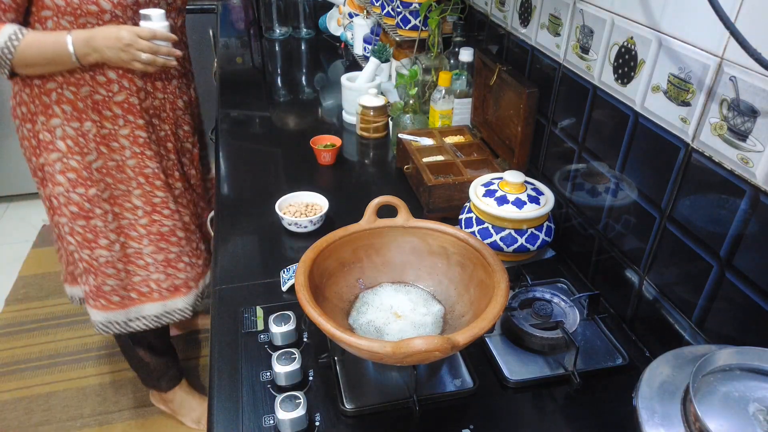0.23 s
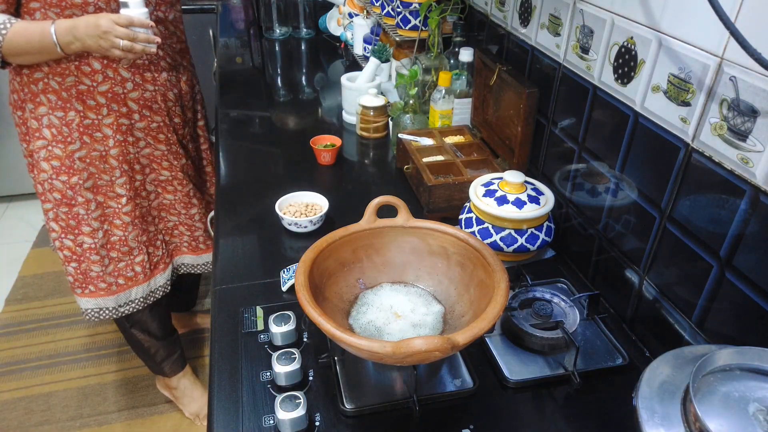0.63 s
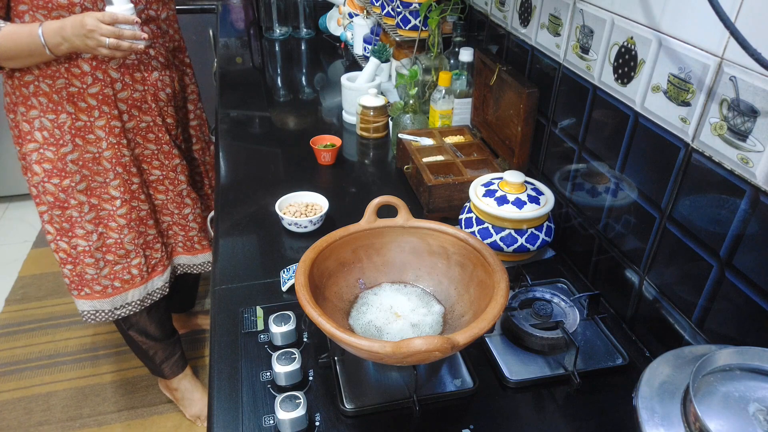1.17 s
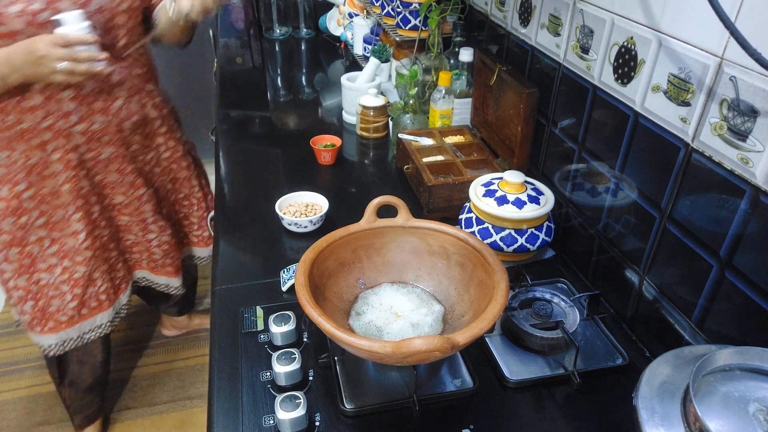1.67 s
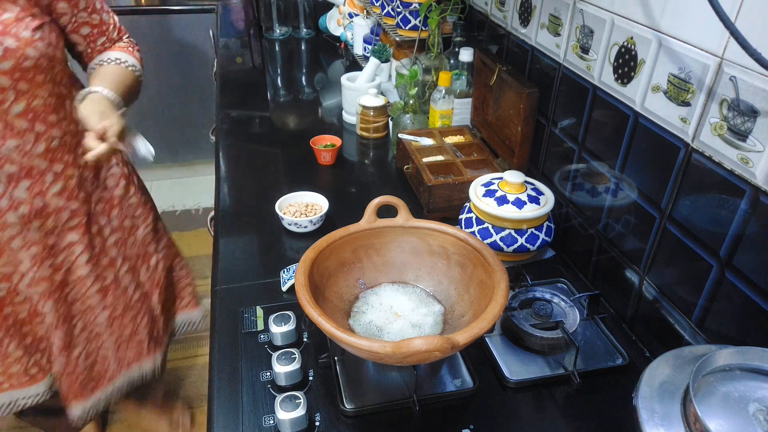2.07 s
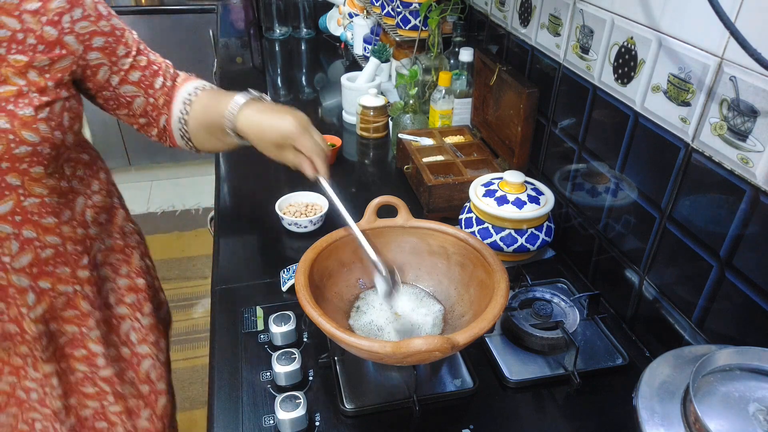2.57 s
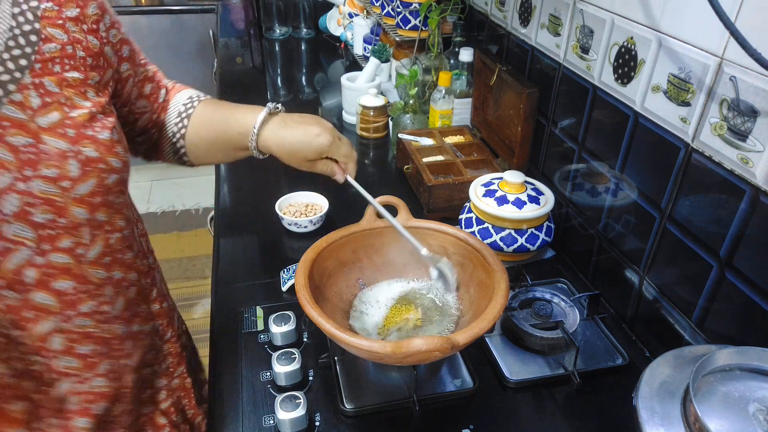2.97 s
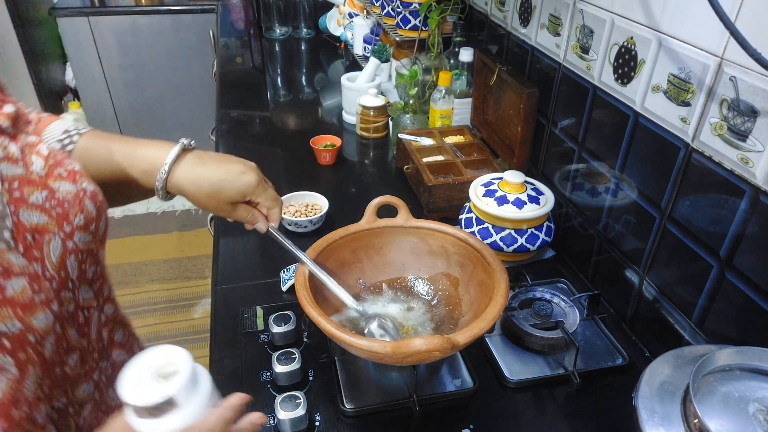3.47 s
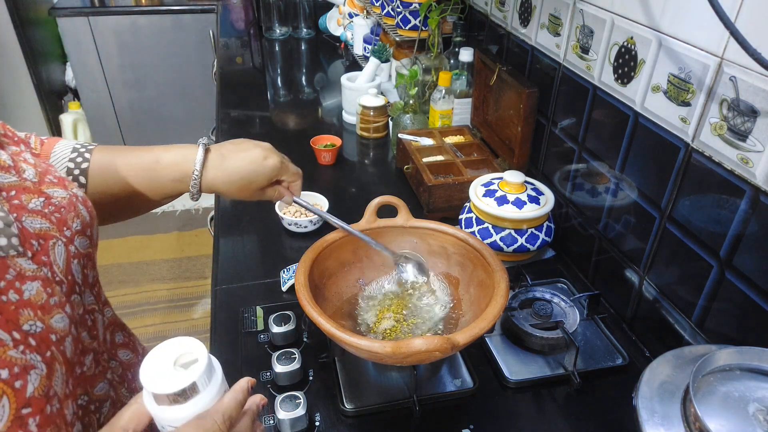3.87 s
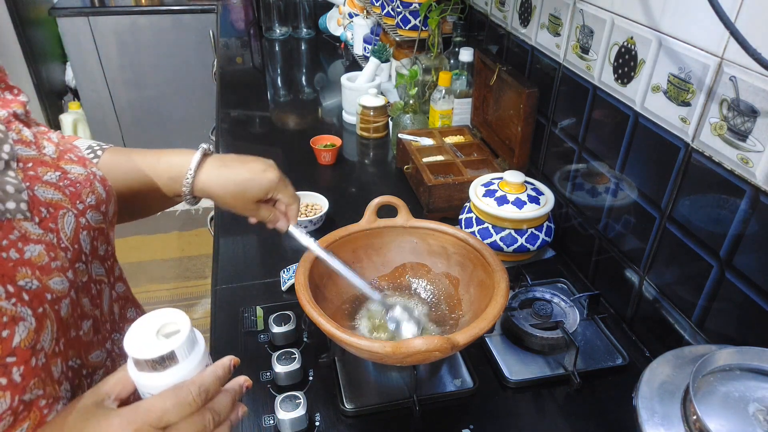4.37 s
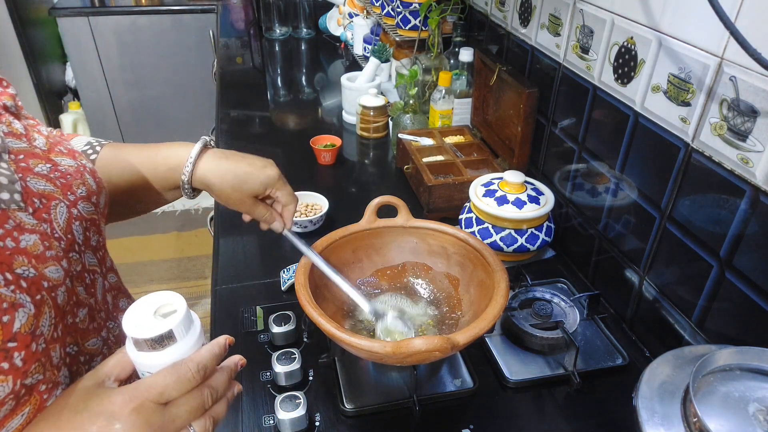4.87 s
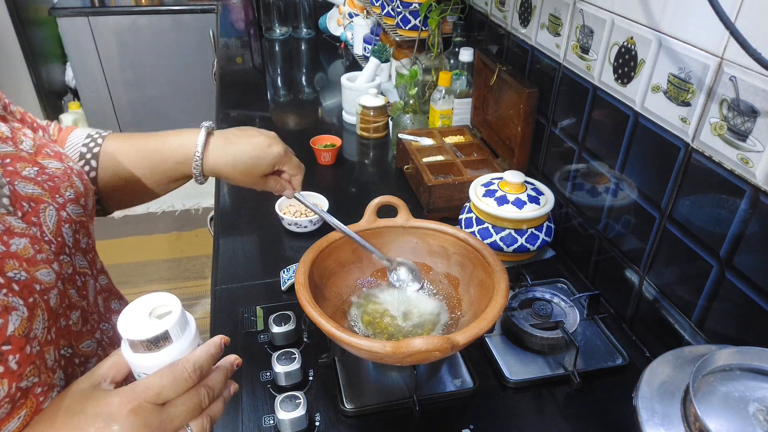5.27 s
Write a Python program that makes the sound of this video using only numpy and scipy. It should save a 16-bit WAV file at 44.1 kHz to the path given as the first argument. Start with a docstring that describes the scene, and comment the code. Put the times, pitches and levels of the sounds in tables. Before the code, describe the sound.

Mustard seeds pop in hot oil from the start, with sharp, bright, irregular cracks over a faint fizz. A low appliance hum and rush of air run underneath, and the small tiled kitchen adds a short echo. At about 0.5 seconds a spice jar's lid rubs, comes off with a hollow plop at 0.7, and gives a light knock. Around 1.2 seconds steel slides over steel as a ladle is fetched, ringing briefly. From 2.5 seconds the ladle taps the clay pot several times, then scrapes round it in three gritty turns, at roughly 3.2, 4.1 and 4.9 seconds. Each turn has a short squeak and a metallic ring as the ladle slips, with light knocks between. The pops thin out after 3.5 seconds and end before 4. A last tap and short scrape come at about 5.5 seconds.

```python
"""In a small tiled kitchen, an appliance hums while mustard seeds pop in hot oil in a clay pot.
Each husk splits with a crack and a snap of steam, and fine bubbles fizz around the seeds.
A spice jar's lid rubs and comes off with a hollow plop; steel clatters as a ladle is fetched.
The ladle taps the pot and scrapes round it in three turns, catching on the grains of the clay,
squeaking, and ringing each time it slips."""
import sys
import numpy as np
from scipy import signal
from scipy.fft import rfft, irfft, next_fast_len
from scipy.io import wavfile
from scipy.ndimage import uniform_filter1d, map_coordinates

SR = 44100
rng = np.random.default_rng(int(sys.argv[2]) if len(sys.argv) > 2 else 0)


def to_wav(s):
    """Save 16-bit WAV."""
    ch = np.atleast_2d(s).T  # columns
    pcm = np.round(np.clip(ch, -1, 1) * 32767)  # PCM
    wavfile.write(sys.argv[1], SR, pcm.astype(np.int16))


N = 242991
TIME = np.arange(N) / SR  # seconds into the scene
AGE = np.arange(SR * 3 // 5) / SR  # seconds into one short sound

# Levels in the tables are relative. A "decay" is the time a sound takes to fade by 60 dB.
# How long the tiled room echoes: f/Hz, decay/s
ROOM_DECAY = [(200, 0.47), (1000, 0.41), (3500, 0.33), (9000, 0.27), (16000, 0.21)]
# Tone colour of the low rush of air: f/Hz, level/dB
AIR_SPECTRUM = [(15, -24), (25, -15), (58, -12.5), (102, 1), (257, -10.5), (486, -10.5), (918, -29),
                (1200, -60), (2360, -46), (2500, -49), (3250, -68), (5500, -120)]
# The appliance's drone: f/Hz, level/dB, half width/Hz
HUM_BANDS = [(99.2, -52.5, 4.6), (94.3, -50, 7.4), (164.1, -54, 1.75), (313.7, -59.5, 12)]
# How strongly the oil fizzes: t/s, level/dB
FIZZ_LEVELS = [(0, -58.5), (1.1, -46), (1.6, -61.5), (3.0, -53.5), (3.35, -49), (3.6, -54), (4.7, -58),
               (5.5, -57)]
# Tone colour of the bubbles: f/Hz, level/dB
FIZZ_SPECTRUM = [(800, 0.5), (2500, -4.5), (5000, -4.5), (9000, -8), (12500, -2.5), (15500, -11),
                 (18000, -41)]
# Twists of the lid: t/s at full pressure, rise/s, hold/s, level/dB
LID_TWISTS = [(0.545, 0.012, 0.05, -43), (0.657, 0.081, 0.034, -34.5), (0.817, 0.0072, 0.42, -39)]
# Tone colour of the lid rubbing on the rim: f/Hz, level/dB
RUB_SPECTRUM = [(350, -34), (600, -5), (1040, -7.5), (1520, 2), (6960, -4), (9880, -10), (13100, -7),
                (15000, -12.5)]
# Tones of the air inside the jar: f/Hz, level/dB, decay/s
JAR_TONES = [(447.4, -2.5, 0.2), (424, -5, 0.28), (506, -7, 0.4), (725, -11, 0.13), (930, -3, 0.053),
             (1112, -6, 0.084)]
# Steel sliding on steel: t/s, level/dB, swell/s, decay/s
STEEL_SLIDES = [(1.163, -24, 0.00039, 0.5), (1.197, -9.5, 0.004, 0.14), (1.215, -11, 0.041, 0.25)]
# Tone colour of that sliding: f/Hz, level/dB
SLIDE_SPECTRUM = [(120, -35), (200, -36), (299, -0.5), (491, -11), (548, -10.5), (749, -18.5), (791, -15.5),
                  (2050, -4), (2330, -3), (3690, -6.5), (4350, -4), (12600, -6.5), (16000, -6)]
# Tones of the steel left ringing: f/Hz, level/dB, decay/s
STEEL_TONES = [(2426, 12, 0.33), (2660, -2, 0.68), (4100, -4, 0.99), (6900, 0, 0.72), (8100, 6, 0.71),
               (10500, 10, 0.58)]
# Knocks of the ladle and the jar: t/s, level/dB, f/Hz at the centre of the tap
KNOCK_HITS = [(0.13, -44, 2800), (0.1485, -29, 3450), (0.8183, -31.5, 1780), (1.478, -43, 1940),
              (1.886, -40.5, 3500), (2.5087, -45.5, 3320), (2.5606, -35.5, 3650), (2.6318, -40, 2400),
              (2.744, -37.5, 4120), (2.8456, -27.5, 4100), (2.847, -36, 600), (3.106, -30.5, 2420),
              (3.1438, -31, 3600), (3.226, -37, 3950), (4.093, -31.5, 3100), (4.357, -44, 3700),
              (4.5387, -38.5, 4170), (4.7513, -38, 2280), (5.4141, -37, 3340)]
# Tone colour of a knock's tap: f/centre f, level/dB
TAP_SHAPE = [(1 / 6, -22), (1 / 2, -8), (1, 0), (1.33, -5), (2, -16), (5, -24)]
# Tone colour of a knock's thud: f/Hz, level/dB
THUD_SPECTRUM = [(80, -8), (300, -20), (650, 13), (1500, -22), (5000, -79)]
# Squeaks of steel: t/s, level/dB, length/s, start f/Hz, end f/Hz
SQUEAK_GLIDES = [(1.322, -30, 0.046, 2690, 2690), (3.287, -34.5, 0.14, 1080, 1348),
                 (4.131, -30.5, 0.063, 1580, 1310), (4.829, -30.5, 0.094, 1564, 1368)]
# Ladle strokes: t/s at full pressure, rise/s, hold/s, scrape level/dB, grind level/dB, ring level/dB
LADLE_STROKES = [(2.602, 0.023, 0.0072, -35.5, -51, -73), (2.844, 0.0033, 0.047, -32, -39.5, -49),
                 (3.248, 0.069, 0.25, -31.5, -37.5, -32), (3.667, .06, 0.027, -41, -39.5, -34),
                 (4.093, 0.06, 0.16, -30.5, -38.5, -34), (4.428, .08, 0.0228, -37.5, -40, -33),
                 (4.852, .13, 0.16, -31.5, -37.5, -32), (5.416, 0.0022, 0.0054, -52, -60, -47.5),
                 (5.478, 0.033, .02, -36, -43, -35)]
# Tone colour of the bright scraping on clay: f/Hz, level/dB
SCRAPE_SPECTRUM = [(150, -17), (280, -14), (480, -4.5), (800, -21), (1600, -15.5), (2200, 1.5),
                   (2700, -2.5), (3200, 3), (4400, -1), (5500, -8), (8000, -14), (11000, -19.5),
                   (16000, -16)]
# Tone colour of the low grinding on clay: f/Hz, level/dB
GRIND_SPECTRUM = [(90, -20), (170, -3), (260, 1.5), (420, -13), (800, -5), (1100, -6), (1400, -1),
                  (1800, -13), (2300, -8.5), (6000, -56)]
# Tones of the ladle's steel bowl, lowest first: f/Hz, level/dB, decay/s
LADLE_TONES = [(1292, -3, 0.34), (1841, 7.5, 0.23), (2134, -7.5, 0.33), (2566, 8.5, 0.16), (3050, -8, 0.33),
               (3920, -24.5, 0.33), (4340, 3.5, 0.089), (5275, -13, 0.21)]
# Seed pops, and one faint tick just before the louder pop at 2.05 s: t/s, crack level/dB, snap level/dB
POPS_AND_TICK = [(0.0014, -28, -27.5), (0.1492, -17, -38), (0.3524, -18, -34), (0.381, -21, -29.5),
                 (0.4354, -29, -33.5), (0.5554, -36.5, -30), (0.6196, -30, -30.5), (0.883, -14.5, -45),
                 (0.949, -21, -28.5), (0.9783, -25.5, -39), (1.0075, -27.5, -30), (1.413, -25, -34),
                 (1.7371, -26, -47), (1.7537, -23.5, -27), (1.9936, -36.5, -45), (2.0425, -30, -48),
                 (2.0519, -21, -32.5), (2.2595, -25.5, -26.5), (2.3306, -30.5, -41), (2.387, -41.5, -50),
                 (2.4786, -35, -41.5), (2.5516, -31, -50), (2.729, -31, -36), (2.8253, -31.5, -38),
                 (2.8942, -25, -34), (2.9839, -22, -31), (3.052, -32, -35), (3.0854, -21, -28),
                 (3.1568, -27, -41), (3.4115, -20.5, -29), (3.454, -23, -21), (3.847, -36.5, -47)]
# Tone colour of a husk cracking: f/Hz, level/dB
CRACK_SPECTRUM = [(500, -26.5), (2500, -10.5), (5000, -2), (7500, 2.5), (10000, -0.5), (13000, 7.5),
                  (15500, 0.5), (18000, -3)]
# Tone colour of the snap of steam: f/Hz, level/dB
SNAP_SPECTRUM = [(150, -21), (500, 0.5), (900, -7.5), (1800, -2), (3300, 2), (5000, 2.5), (8000, -32),
                 (16000, -1)]


def amp(db):
    """Turn decibels into a number to multiply a sound by."""
    return 10 ** (np.asarray(db) / 20)


def unit(x):
    """Scale a signal to an average power of 1."""
    return x / np.sqrt(np.mean(x ** 2) + 1e-20)


def pan(right_db):
    """Left and right gains that make the right side right_db louder than the left."""
    return amp([[-right_db / 2], [right_db / 2]])


def look_up(points, hz):
    """Read between the rows of a (frequency, value) table, on a scale of octaves."""
    freqs, values = np.transpose(points)
    return np.interp(np.log(hz + 1), np.log(freqs + 1), values)


def wobble(rate):
    """A smooth curve through `rate` random values a second."""
    return map_coordinates(rng.standard_normal(int(N * rate / SR) + 4), [TIME * rate])


def fade(decay_s, t=AGE):
    """A curve that falls by 60 dB in decay_s seconds."""
    return np.exp(-np.log(1000) * t / decay_s)


def add(track, start_s, sound):
    """Mix a sound into a track at the given time."""
    part = track[..., max(round(start_s * SR), 0):][..., :sound.shape[-1]]
    part += sound[..., :part.shape[-1]]


def colour(x, spectrum):
    """Give a sound a tone colour; white noise keeps its power."""
    n = x.shape[-1]
    size = 2 * next_fast_len(n // 2 + 2048)
    gain = unit(amp(look_up(spectrum, np.fft.rfftfreq(size, 1 / SR))))
    cepstrum = irfft(np.log(gain + 1e-6))
    # Folding onto the first half makes the filter ring after a click, never before it.
    cepstrum[1:size // 2] *= 2
    cepstrum[size // 2 + 1:] = 0
    return irfft(rfft(x, size) * np.exp(rfft(cepstrum)), size)[..., :n]


def grains(rate, spread_db, size=N):
    """Tiny random clicks of uneven strength, about `rate` a second."""
    hits = rng.random(size) < rate / SR
    signs = rng.choice([-1, 1], size)
    strengths = amp(spread_db * np.clip(rng.standard_normal(size), -2, 2))
    return unit(hits * signs * strengths)


def ring(tones, swell_s, roughness, touch_s=0.35):
    """An object's own fading tones, which waver while the parts touch and then settle."""
    hz, db, decay_s = np.transpose(tones)[:, :, None]
    jostle = rng.standard_normal((len(hz), len(AGE))) * fade(touch_s)
    wander = np.cumsum(jostle, 1) / np.sqrt(SR)
    phase = 2 * np.pi * (hz * AGE + rng.random(hz.shape) + roughness * wander)
    level = amp(db + rng.standard_normal(hz.shape))
    return np.sum(level * fade(decay_s) * np.sin(phase), 0) * (1 - np.exp(-AGE / swell_s))


def spread(x):
    """A ringing tone reaches left and right a sixth of a cycle apart."""
    turn = np.exp(1j * np.pi / 6 * np.array([[1], [-1]]))
    return np.real(signal.hilbert(x, next_fast_len(N))[:N] * turn)


def room_echo():
    """The kitchen's echo of a click, left and right: noise whose treble dies first."""
    hz, t, bands = signal.stft(rng.standard_normal((2, len(AGE))), SR, nperseg=256)
    bands = bands * fade(look_up(ROOM_DECAY, hz)[:, None], t)
    echo = signal.istft(bands, SR, nperseg=256)[1][:, :len(AGE)]
    return echo / np.linalg.norm(echo[0])


def in_room(x, echo_db):
    """A sound with its echoes, at about the same power."""
    echo = signal.fftconvolve(x[None], room_echo(), axes=1)[:, :len(x)]
    return (x + amp(echo_db) * echo) / np.hypot(1, amp(echo_db))


def burst(scatter_db, scatter_s, echo_db):
    """A faint tick, then a click with its bounce off the pot, scatter off the stove and room echo."""
    scatter = rng.standard_normal((2, len(AGE))) * fade(scatter_s)
    click = amp(scatter_db) * scatter / np.linalg.norm(scatter[0]) + amp(echo_db) * room_echo()
    for side, bounce_s in zip(click, rng.uniform(.0008, .0012, 2)):
        side[rng.integers(5)] += 1
        side[round(bounce_s * SR)] += .6
    tick = np.zeros((2, round(.0009 * SR)))
    tick[:, 0] = 0.19
    return np.hstack([tick, click])


def pressure_db(peak_s, rise_s, hold_s, rise_db=28.5, sag_db_per_s=34, release_db_per_s=158):
    """A hand bears down to 0 dB at peak_s, slackens through the hold, then eases off."""
    since = TIME - peak_s
    return (-rise_db * np.maximum(-since, 0) / rise_s
            - sag_db_per_s * np.clip(since, 0, hold_s)
            - release_db_per_s * np.maximum(since - hold_s, 0))


def moving_contact(x, depth_db):
    """Narrow peaks, mostly below 6 kHz, come and go as the touching point moves; loudness stays."""
    hz, _, bands = signal.stft(x, SR, nperseg=512)
    drift = uniform_filter1d(rng.standard_normal(bands.shape[1:]), size=3, axis=0)  # smooth in pitch
    drift = unit(uniform_filter1d(drift, size=5, axis=1))  # and in time
    gain = amp(depth_db * np.clip(drift, -1.5, 1.5) / np.hypot(1, (hz[:, None] / 6000) ** 2))
    gain /= np.sqrt(uniform_filter1d(gain ** 2, size=17, axis=0))
    return unit(signal.istft(bands * gain, nperseg=512)[1][:, :N])


def air_and_appliance():
    """A low rush of air and an appliance's drone; both sink for a second before the stirring."""
    middle, side = colour(rng.standard_normal((2, N)), AIR_SPECTRUM)
    air = amp(-53) * np.array([middle + amp(-12) * side, middle - amp(-12) * side])
    freqs = np.fft.rfftfreq(N, 1 / SR)
    hum = np.zeros(N)
    for hz, db, width_hz in HUM_BANDS:
        narrow_noise = rfft(rng.standard_normal(N)) / (1 + ((freqs - hz) / width_hz) ** 2)
        hum += amp(db) * unit(irfft(narrow_noise, N))
    level = amp(np.interp(TIME, [1.2, 1.6, 2.4, 3.1], [4, 0, 0, 4]))
    return level * (air + amp(-2.5) * hum * pan(right_db=3))


def oil_fizz():
    """Fine bubbles fizz round the seeds, each one a tiny click."""
    times, levels_db = np.transpose(FIZZ_LEVELS)
    level = uniform_filter1d(amp(np.interp(TIME, times, levels_db)), 256)
    bubbles = colour(grains(4000, spread_db=2), FIZZ_SPECTRUM)
    return in_room(level * bubbles, echo_db=29)


def spice_jar(plop_s=.656):
    """The lid rubs on the rim, then lets go and sets the air in the jar ringing."""
    plop = np.zeros(N)
    add(plop, plop_s, amp(-19) * ring(JAR_TONES, swell_s=0.0075, roughness=2.86, touch_s=1.0))
    twist = sum(amp(db + pressure_db(t, rise_s, hold_s)) for t, rise_s, hold_s, db in LID_TWISTS)
    rub = twist * amp(-1) * colour(grains(2700, spread_db=3), RUB_SPECTRUM)
    return in_room(plop, echo_db=-4.5) + in_room(rub, echo_db=3.5)


def steel_clatter(ring_s=1.2):
    """Steel slides over steel in a rush of tiny contacts and is left ringing as it swings."""
    rush, chime = np.zeros((2, N))
    for t, db, swell_s, decay_s in STEEL_SLIDES:
        level = amp(db) * fade(decay_s) * (1 - np.exp(-AGE / swell_s))
        add(rush, t, level * grains(7000, spread_db=-4, size=len(AGE)))
    add(chime, ring_s, amp(-37) * ring(STEEL_TONES, swell_s=0.018, roughness=2.5, touch_s=3.5))
    swing = amp(3 * np.array([wobble(35), wobble(35)]))
    slide = in_room(colour(rush, SLIDE_SPECTRUM), echo_db=11.5)
    return (slide + swing * spread(chime)) * pan(right_db=2)


def knocks():
    """The ladle and the jar knock: each blow is a dull tap over a low thud."""
    track = np.zeros((2, N))
    for t, db, centre_hz in KNOCK_HITS:
        blow = burst(scatter_db=10.5, scatter_s=0.051, echo_db=12.5)
        tap = colour(blow, [(centre_hz * ratio, gain_db) for ratio, gain_db in TAP_SHAPE])
        thud = colour(blow, THUD_SPECTRUM)
        add(track, t, amp(db + 13) * tap + amp(db - 3) * thud)
    return track


def steel_squeaks(jitter_hz=130):
    """Steel sticks and slips, making unsteady tones that glide as the touching point moves."""
    track = np.zeros(N)
    for t, db, length_s, start_hz, end_hz in SQUEAK_GLIDES:
        progress = np.linspace(0, 1, round(length_s * SR))
        jitter = unit(uniform_filter1d(rng.standard_normal(len(progress)), size=60))
        hz = start_hz + (end_hz - start_hz) * progress + jitter_hz * jitter
        arch = np.sqrt(4 * progress * (1 - progress))
        add(track, t, amp(db - 1) * arch * np.sin(2 * np.pi * np.cumsum(hz) / SR))
    flutter = unit(amp(3.4 * wobble(150)))
    return in_room(track * flutter, echo_db=-1.5)


def ladle_stirring(slip_lead_s=.022, rebound_s=.075, rebound_db=-12, lift_s=5.06):
    """The rim catches on grains of clay; as each stroke ends it slips, and the steel bowl rings."""
    scrape_level, grind_level, bowl = np.zeros((3, N))
    for t, rise_s, hold_s, scrape_db, grind_db, ring_db in LADLE_STROKES:
        press_db = pressure_db(t, rise_s, hold_s)
        scrape_level += amp(scrape_db + press_db)
        grind_level += amp(grind_db + 0.65 * press_db)  # grinding follows the hand less closely
        slip_s = t + max(hold_s - slip_lead_s, 0)
        grind_level += amp(ring_db - 9.5 + pressure_db(slip_s, 0.045, 0))  # the slip jolts the pot
        # The bowl rings at the slip, then bounces and touches again more softly.
        for start_s, db in [(slip_s, ring_db), (slip_s + rebound_s, ring_db + rebound_db)]:
            add(bowl, start_s, amp(db) * ring(LADLE_TONES, swell_s=min(.017, rise_s), roughness=1.9))
    # Lifted clear, the ladle rings on with its lowest tone.
    add(bowl, lift_s, amp(-30) * ring(LADLE_TONES[:1], swell_s=0.014, roughness=0.55))
    catching = unit(amp(3.5 * np.clip(wobble(110), -1.5, 1.5)))
    scrape_grit = in_room(catching * grains(2000, spread_db=4), echo_db=5)
    scrape = scrape_level * colour(moving_contact(scrape_grit, depth_db=4), SCRAPE_SPECTRUM)
    grind_grit = in_room(catching * grains(2000, spread_db=5), echo_db=-2)
    grind = grind_level * colour(moving_contact(grind_grit, depth_db=3.5), GRIND_SPECTRUM)
    shimmer = amp(4.84 * np.array([wobble(60), wobble(60)]))
    return scrape + amp(-5) * grind + spread(bowl) * shimmer


def popping_seeds():
    """Husks split with a bright crack and a lower snap of steam; a faint tick leads the 2.05 s pop."""
    cracks, snaps = np.zeros((2, 2, N))
    for t, crack_db, snap_db in POPS_AND_TICK:
        add(cracks, t, amp(crack_db + 14) * burst(scatter_db=1.5, scatter_s=0.027, echo_db=5))
        add(snaps, t, amp(snap_db + 10) * burst(scatter_db=7.5, scatter_s=0.015, echo_db=10.5))
    pops = colour(cracks, CRACK_SPECTRUM) * pan(right_db=2.4) + colour(snaps, SNAP_SPECTRUM)
    return pops * pan(right_db=-2)  # the pot sits a little to the left


def scene():
    """All the kitchen's sounds together, in stereo."""
    return (popping_seeds() + knocks() + spice_jar() + steel_clatter() + ladle_stirring()
            + steel_squeaks() + oil_fizz() + air_and_appliance())


def record(dry):
    """Cut away the very highest treble."""
    cutoff_hz = 15850
    size = next_fast_len(N + SR // 2)
    freqs = np.fft.rfftfreq(size, 1 / SR)
    return irfft(rfft(dry, size) / (1 + (freqs / cutoff_hz) ** 110), size)[:, :N]


dry = scene()
out = record(dry)
to_wav(out)
```